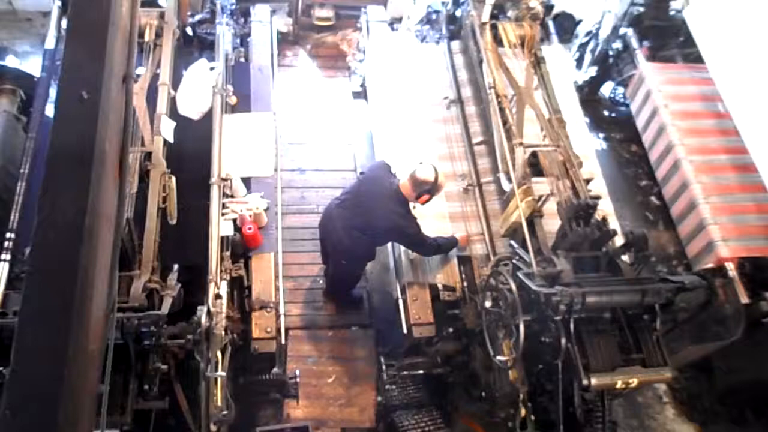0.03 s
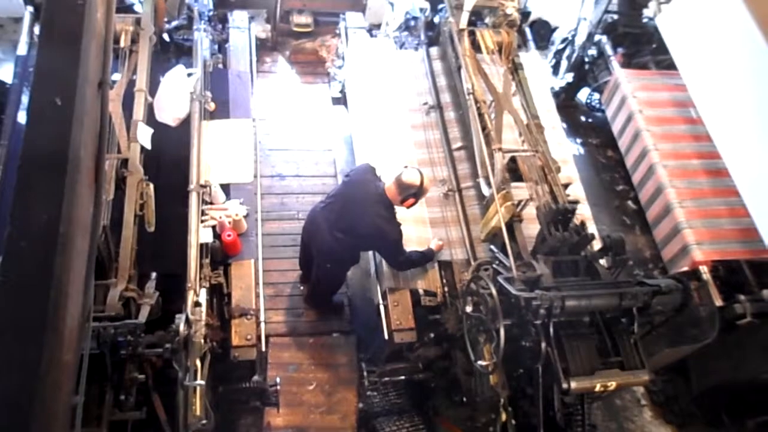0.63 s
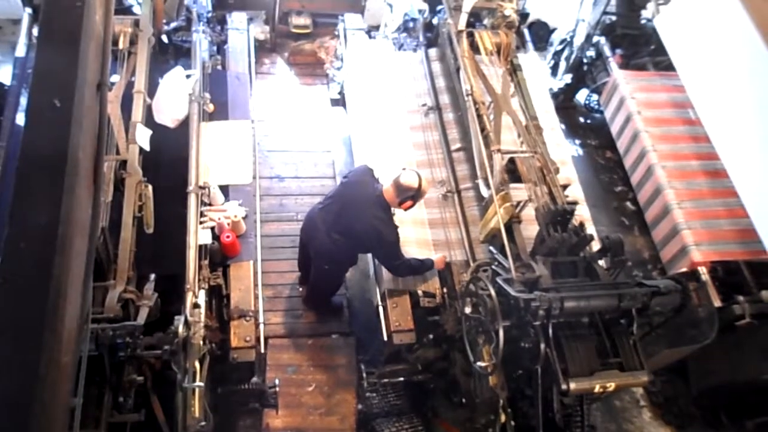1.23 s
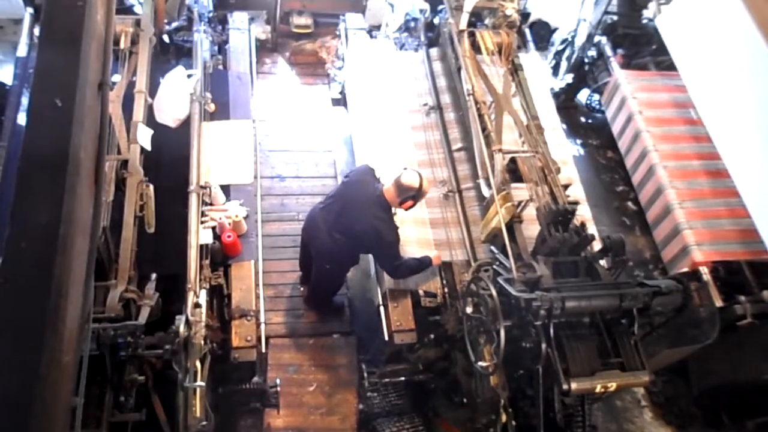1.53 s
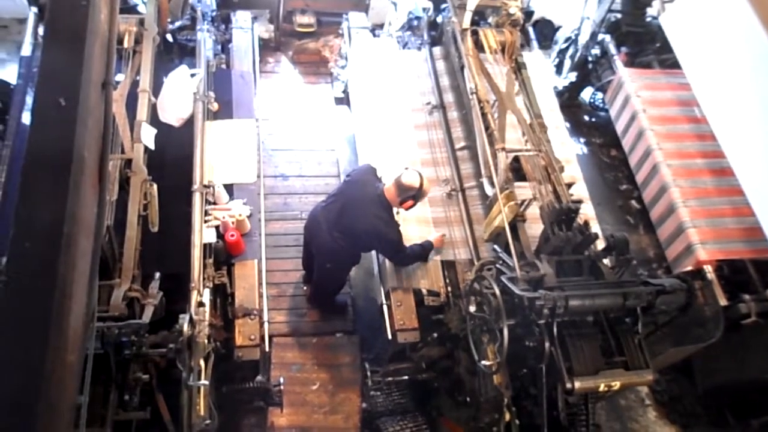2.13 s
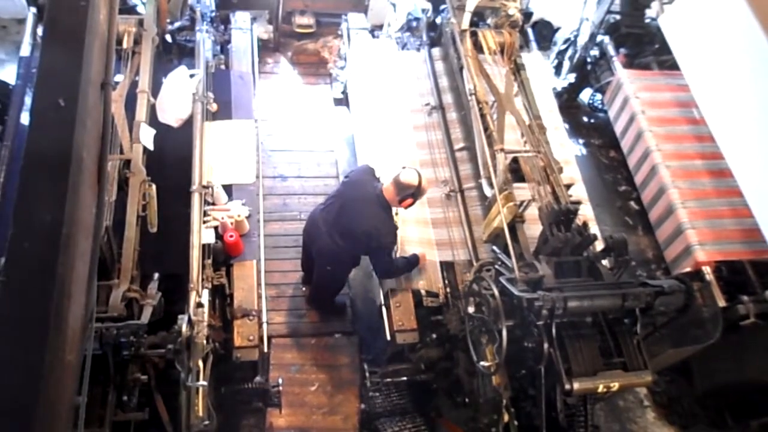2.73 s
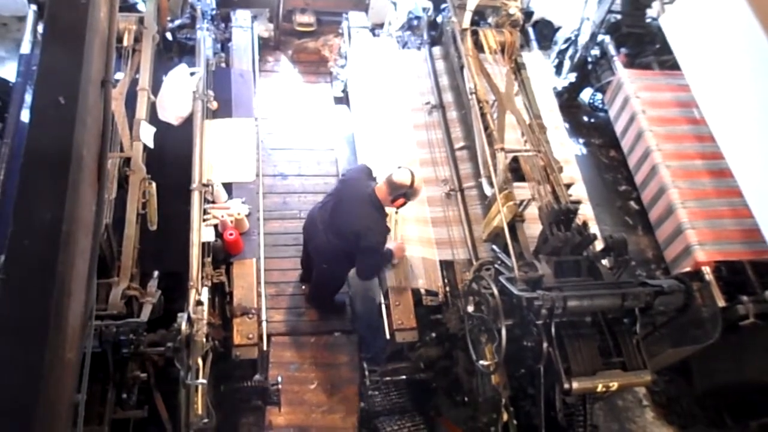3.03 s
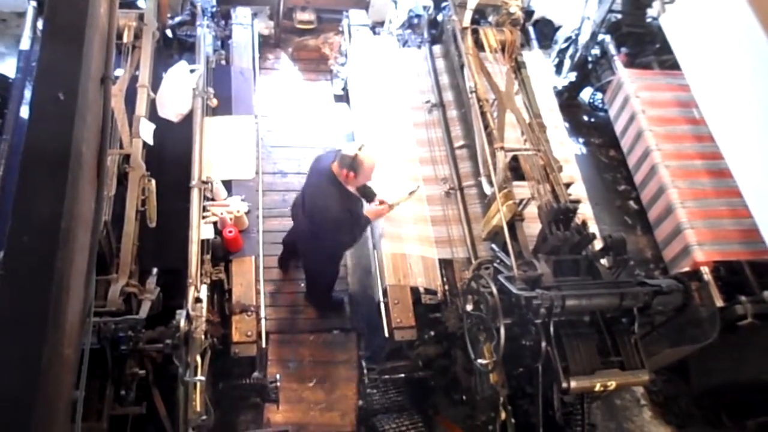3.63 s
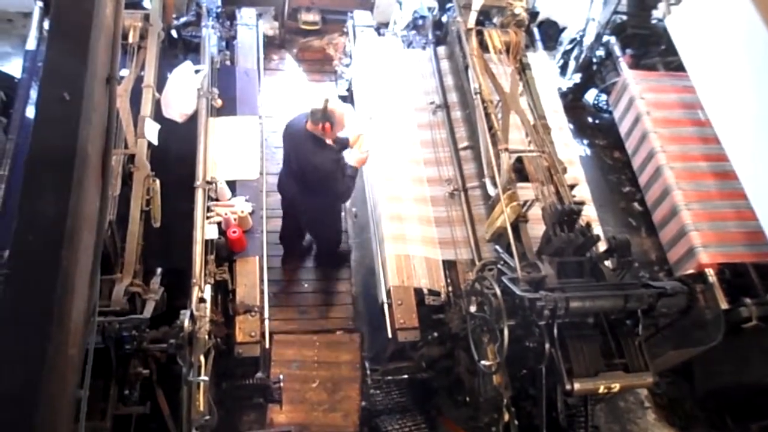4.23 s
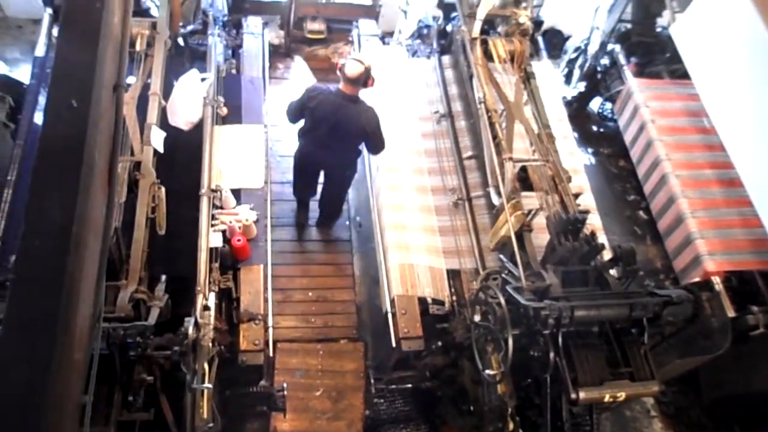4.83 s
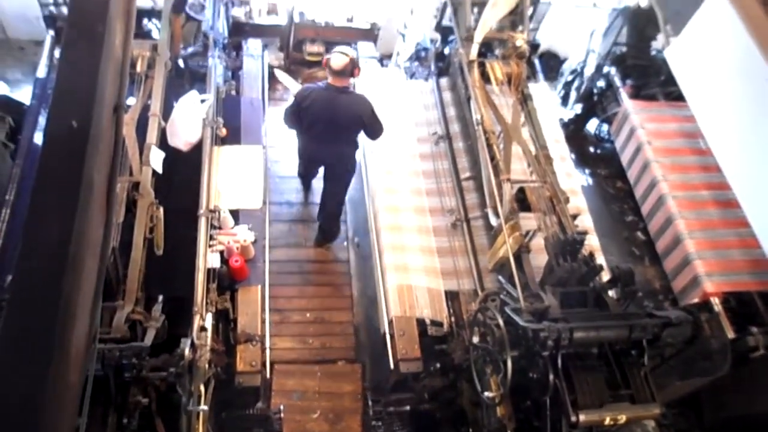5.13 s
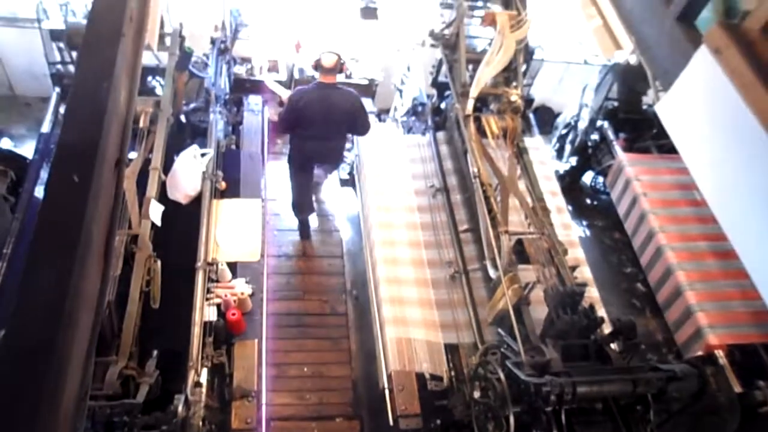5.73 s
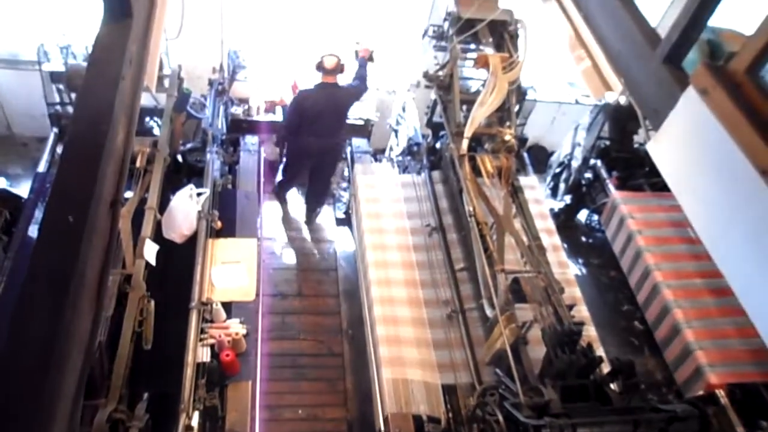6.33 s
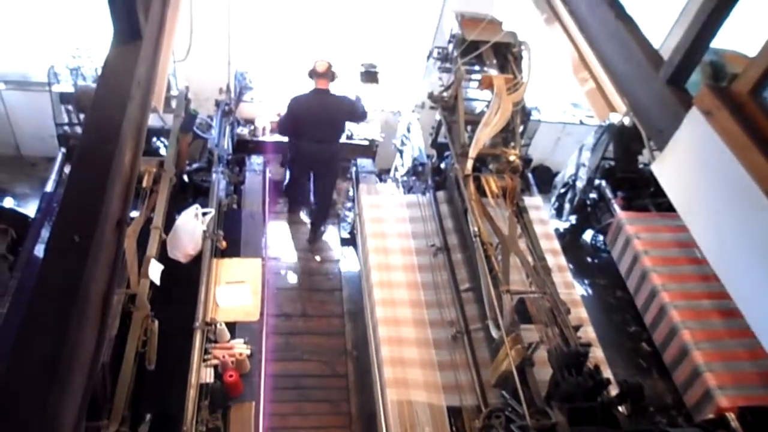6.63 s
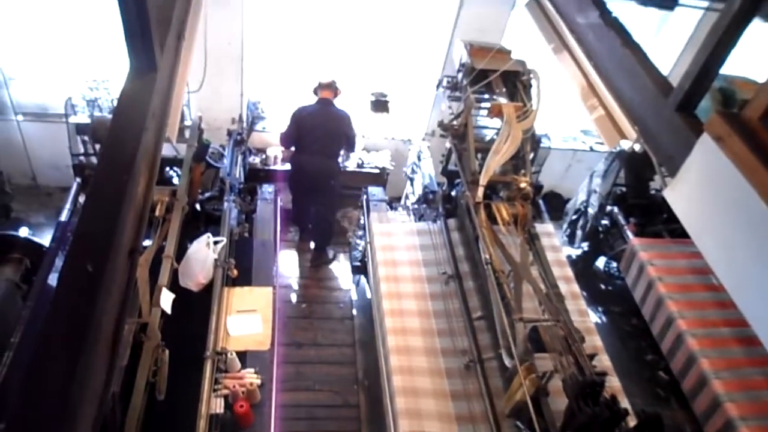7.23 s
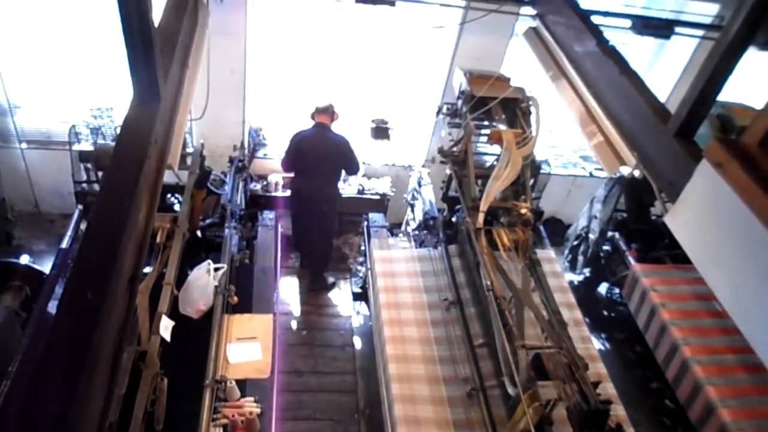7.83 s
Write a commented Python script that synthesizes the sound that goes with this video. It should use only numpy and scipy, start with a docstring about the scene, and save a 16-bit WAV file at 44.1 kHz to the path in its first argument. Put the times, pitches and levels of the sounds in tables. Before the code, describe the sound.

Loud, rhythmic clatter from a weaving loom starts suddenly and carries on without a break, heard in mono in an echoing hall. Each cycle brings a rattle of the harness and levers, a sharp wooden crack with a low thud, then the hard knock of the shuttle landing. The strokes vary slightly in force. Underneath, gears grind, small metal parts jingle, a loose wheel rings faintly and the drive gives a steady rushing rumble.

```python
"""A shuttle power loom weaves at about 83 picks a minute in a mill hall, in mono, cutting in abruptly.
In each crank turn the harness rattles up, levers drop, and the picking stick whips the shuttle off
with a thump through the floor. A loose wheel sings; a quarter second after the pick the shuttle slams
into the far box and meets the buffer. The weave repeats every four picks.
Throughout, gears grind, loose parts clink, dry joints squeak now and then, and the floor rumbles."""
import sys
import numpy as np
from scipy import signal
from scipy.io import wavfile
from scipy.ndimage import uniform_filter1d

SR = 44100
rng = np.random.default_rng(int(sys.argv[2]) if len(sys.argv) > 2 else 0)


def log_audio(samples):
    """Write samples as a 16-bit WAV file to the path given in sys.argv[1]."""
    # one column per channel
    frames = np.atleast_2d(samples).T
    # limit to full scale, then quantise
    limited = np.clip(frames, -1, 1)
    pcm = np.round(limited * 32767).astype(np.int16)
    wavfile.write(sys.argv[1], SR, pcm)


N = 352359
TIME = np.arange(N) / SR
START_S, CUTOFF_HZ = .538, 15800

# shuttle throws, one per crank turn: start_s, extra_db
PICKS = [(.672, -1), (1.38, -.5), (2.109, -3), (2.841, -1), (3.566, 0), (4.276, 0), (5.004, -3), (5.731, 1),
         (6.458, 0), (7.166, -0.5), (7.894, -3)]
# the four throws of the weave: wood_db, crack_db, thump_db
THROWS = [(-2, 1.5, -7), (-0.5, -1, -11), (3.5, 2, -6.5), (-5.5, 0, -12)]
# iron frame resonances: pitch_hz, width_hz, gain_db
FRAME_MODES = [(114, 6.3, -23), (158, 13, -6.5), (217, 11, -5.5), (272, 34, -3), (350, 52, -21),
               (718, 110, -9.5), (965, 36, -4.5), (1197, 45, -2.5), (1487, 110, -7.5), (2510, 350, -9),
               (6900, 530, -16), (8750, 43, -25), (10760, 550, -3), (12850, 40, -14)]
# spectrum of the jolted frame: freq_hz, density_db
JOLT_COLOUR = [(60, -19), (130, -9), (190, -10), (280, -4), (400, 0), (520, -6.5), (800, -1.5), (2000, -45),
               (15500, -60)]
# spectrum of harness and levers: freq_hz, density_db
HARNESS_COLOUR = [(60, -6), (300, -7), (800, -5.5), (1500, 0.5), (2700, -1), (4500, -3), (7000, -3.5),
                  (9000, -7.5), (11000, -12.5), (13000, -22), (15500, -19.5)]


def picking():
    """The stick cracks against the shuttle, the strap snaps taut, the recoil shakes the floor."""
    # spectra of stick and floor: freq_hz, density_db
    stick_colour = [(60, -28), (250, -12), (500, -5.5), (750, -6), (1200, 4), (2000, 0.5), (3000, -2),
                    (4500, -7.5), (7000, -2.5), (10000, -13), (12500, -15.5), (15500, -20.5)]
    floor_colour = [(30, -12), (58, -18), (85, -8), (125, 0), (200, -2.5), (280, -2.5), (450, -2.5),
                    (700, -3.5), (1500, -16), (15500, -62)]
    contact_s = .014
    start_s, extra_db = np.transpose(PICKS)
    wood_db, crack_db, thump_db = extra_db + in_rotation(THROWS, len(start_s))
    stick = responses(stick_colour, FRAME_MODES, near_t60_s=.42, hall_db=-6.5, count=4)
    crack = blows(start_s, wood_db, crack_db, contact_s, stick, split_hz=1600)
    strap = responses(stick_colour, FRAME_MODES, near_t60_s=.047, hall_db=-31, count=3)
    snap = blows(start_s + .0011, crack_db - 12, crack_db - 1.5, contact_s / 2, strap, split_hz=4100)
    floor = responses(floor_colour, FRAME_MODES, near_t60_s=.22, hall_db=-11, count=5)
    thump = blows(start_s, thump_db, thump_db - 7, contact_s, floor, split_hz=570)
    return crack + snap + thump


def shuttle_box():
    """The shuttle grazes the box, slams in, hits the buffer: steel rings, frame jolts, box knocks."""
    # box entries: start_s, buffer_db, note_after_s, note_hz, note_db
    arrivals = [(.924, -6, .012, 2060, -41), (1.628, 2, 0.04, 724, -29), (2.376, -10, .005, 1420, -45),
                (3.121, -3.5, 0.015, 2290, -36), (3.819, -3, .016, 2810, -39),
                (4.52, 2.5, 0.046, 709, -31.5), (5.239, -1, .018, 860, -30), (6.014, -8.5, .006, 1090, -40),
                (6.708, -13, .01, 1400, -42), (7.411, 2, .044, 716, -29)]
    # landings of the four throws: graze_lead_s, graze_db, wood_db, crack_db, jolt_db, contact_s
    landings = [(.012, -5.5, -1.5, 1.5, -25, .009), (0.0066, -30, -3.5, -1, -13, .004),
                (.006, -19, 1, -1.5, -8.5, .004), (.029, -8, -29, 1, -18, .013)]
    # box spectrum: freq_hz, density_db
    box_colour = [(60, -45), (150, -13.5), (270, -14), (500, -16.5), (800, 3.5), (1200, 2), (2200, -0.5),
                  (3000, 1), (4500, -6), (7200, -5), (8700, -9), (12000, -10.5), (13500, -20), (15500, -22)]
    # steel fittings: pitch_hz, width_hz, gain_db
    steel_modes = [(1357, 48, -5.5), (2006, 130, 0), (2350, 52, -11), (2740, 49, -12), (3690, 82, -1.5),
                   (5200, 29, -17), (5680, 25, -21), (6350, 33, -4), (7630, 64, 0), (10720, 76, 0),
                   (12180, 70, -21), (13570, 60, -1), (15000, 80, 1)]
    start_s, buffer_db, note_after_s, note_hz, note_db = np.transpose(arrivals)
    graze_lead_s, graze_db, wood_db, crack_db, jolt_db, contact_s = in_rotation(landings, len(start_s))
    stop_s = start_s + .04
    box = responses(box_colour, steel_modes, near_t60_s=.19, hall_db=-6.5, count=5)
    frame = responses(JOLT_COLOUR, FRAME_MODES, near_t60_s=.35, hall_db=-28, count=3)
    graze = blows(start_s - graze_lead_s, graze_db - 1, graze_db, contact_s, box, split_hz=1400)
    slam = blows(start_s, wood_db, crack_db, contact_s, box, split_hz=1400)
    buffer = blows(stop_s, buffer_db, .89 * buffer_db - 3.5, contact_s=.009, paths=box, split_hz=1600)
    jolts_s, jolts_db = np.r_[start_s, stop_s], np.r_[jolt_db, buffer_db - 16.5]
    jolts = blows(jolts_s, jolts_db, jolts_db - 21, contact_s=.00695, paths=frame, split_hz=760)
    knock = ringing(zip(start_s + note_after_s, note_hz, note_db), rise_s=.0011, t60_s=.26, wander_hz=29)
    return graze + slam + buffer + jolts + knock


def levers():
    """Light clacks: levers drop as the shed opens, boxes shift once per repeat, a chain link catches."""
    # lever drops before each pick: lead_s, wood_db, crack_db
    lever_drops = [(0.17, -18, -14.5), (.146, -16, -7), (.058, -6, -17)]
    # chain catches: start_s, wood_db, crack_db
    catches = [(2.549, -25, -10), (2.734, -1.5, -20), (2.819, 0.5, -7), (3.39, -21, -10), (3.459, -8, -19),
               (4.829, -9, -9), (5.505, -19, -11)]
    drops = [(pick_s - lead_s, wood_db, crack_db)
             for pick_s in pick_times() for lead_s, wood_db, crack_db in lever_drops]
    shifts = [(pick_s + .205, -20, -12.5) for pick_s in pick_times()[::len(THROWS)]]
    start_s, wood_db, crack_db = np.transpose(drops + shifts + catches)
    harness = responses(HARNESS_COLOUR, FRAME_MODES, near_t60_s=.084, hall_db=-3.5, count=3)
    return blows(start_s, wood_db, crack_db, contact_s=.01, paths=harness, split_hz=2900)


def running_gear():
    """Harness rattle, gear grind, frame sway and floor rumble swell and ebb with the crank angle."""
    # one crank turn, pick to pick: angle_turns, rattle_db, grind_db, sway_db
    crank_cycle = [(0, -34.5, -33, -38), (.08, -35.5, -35.5, -39.5), (.17, -53.5, -37, -53),
                   (.31, -47, -41, -52), (.37, -31.5, -39.5, -69), (.5, -46, -52.5, -52),
                   (.62, -45.5, -51.5, -52.5), (.72, -38.5, -39.5, -46), (.8, -38.5, -48.5, -48.5),
                   (.88, -32.5, -36, -46.5), (.94, -36, -31.5, -41.5), (1, -33.5, -35, -45)]
    # gear spectrum: freq_hz, density_db
    gear_colour = [(60, -30), (250, -2.5), (500, -1.5), (720, 0.5), (1200, -2), (1700, -2.5), (2500, -6.5),
                   (4000, -12), (8000, -55), (15500, -49)]
    floor_hz, floor_width_hz = 30.6, 16
    angle_turns = crank_turns() % 1
    turns, *levels_db = np.transpose(crank_cycle)
    rattle_db, grind_db, sway_db = [np.interp(angle_turns, turns, db) for db in levels_db]
    extra_rattle_db, extra_grind_db = load_db()
    harness = responses(HARNESS_COLOUR, FRAME_MODES, near_t60_s=.19, hall_db=-3.5, count=3)
    rattle = chatter(harness, rattle_db + extra_rattle_db, per_s=450, uneven_db=4)
    gears = responses(gear_colour, FRAME_MODES, near_t60_s=.1, hall_db=-6.5, count=4)
    grind = chatter(gears, grind_db + extra_grind_db, per_s=600, uneven_db=2.56)
    frame = responses(JOLT_COLOUR, FRAME_MODES, near_t60_s=.18, hall_db=-11.5, count=4)
    sway = chatter(frame, sway_db + extra_grind_db, per_s=500, uneven_db=.71)
    floor = resonance(rng.standard_normal(N), floor_hz, floor_width_hz)
    rumble = rms_one(resonance(floor, floor_hz, floor_width_hz))
    rumble_db = -57 + 4.7 * np.cos(2 * np.pi * (angle_turns - .15))   # peaks just after each pick
    return rattle + grind + sway + rumble * from_db(rumble_db)


def wheel():
    """A loose wheel sings after each pick, louder under load, and when jogged in the pauses."""
    # jogs: start_s, level_db
    jogs = [(1.88, -40), (3.29, -41.5), (4.13, -45), (4.742, -42), (5.511, -35), (6.94, -41.5)]
    pitch_hz, delay_s = 1165, .1
    _, grind_db = load_db()
    after_picks = [(s, grind_db[int(s * SR)] - 40.5) for s in pick_times() + delay_s if s < TIME[-1]]
    strikes = [(s, pitch_hz, db) for s, db in after_picks + jogs]
    return ringing(strikes, rise_s=.014, t60_s=.36, wander_hz=11)


def clinks(level_db, per_s, t60_s, count):
    """Loose rods, links and springs, touched at random, each ring at their own pitch."""
    # ring strength by pitch: pitch_hz, gain_db
    clink_gains = [(600, -3), (1200, 2), (2500, -2), (4500, -8.5), (7500, -6), (10000, -20), (14000, -26)]
    out, t = np.zeros(N + SR), TIME[:SR // 4]
    pitches_hz = np.geomspace(600, 14000, count) * from_db(rng.uniform(-.3, .3, count))
    envelope = from_db(-60 * t / t60_s) * (1 - np.exp(-t / .001))
    for when, part, softness, phase_turns in rng.random((int(per_s * N / SR), 4)):
        at, hz = int(when * N), pitches_hz[int(part * count)]
        db = level_db[at] + at_hz(clink_gains, hz) - 6 * softness
        out[at:at + len(t)] += from_db(db) * envelope * np.sin(2 * np.pi * (hz * t + phase_turns))
    return out[:N]


def squeaks():
    """Dry joints whistle by stick-slip, with a weak octave, heard mostly by way of the hall."""
    # joint slips: start_s, length_s, start_hz, end_hz, level_db, roughness_ratio
    slips = [(1.775, .035, 13100, 13000, -53, .008), (3.264, 0.031, 7460, 7270, -35.5, 0.016),
             (4.02, 0.021, 3670, 3630, -44, 0.018), (5.494, 0.031, 10600, 10430, -36, .007),
             (6.908, .03, 5640, 5600, -46.5, .03), (6.924, 0.065, 4700, 4960, -47, .025),
             (4.18, .05, 14050, 14000, -57, .006), (5.89, .04, 14000, 14000, -61, .005)]
    out = np.zeros(N)
    waver = rms_one(resonance(rng.standard_normal(N), hz=110, width_hz=220))
    for start_s, length_s, start_hz, end_hz, level_db, roughness in slips:
        along = np.clip((TIME - start_s) / length_s, 0, 1)
        on = (along > 0) & (along < 1)
        pitch_hz = (start_hz + (end_hz - start_hz) * along[on]) * (1 + roughness * waver[on])
        phase = 2 * np.pi * np.cumsum(pitch_hz) / SR
        octave = from_db(-19) * (2 * start_hz < CUTOFF_HZ) * np.sin(2 * phase)
        out[on] += from_db(level_db) * np.sin(np.pi * along[on]) * (np.sin(phase) + octave)
    tail = rms_one(rng.standard_normal(SR) * from_db(-60 * TIME[:SR] / .25)) / np.sqrt(SR)
    return out + 2 * signal.oaconvolve(out, tail)[:N]


def drive_wash():
    """Steady noise of the drive in the hall."""
    # wash spectrum: freq_hz, density_db
    wash_colour = [(20, -12), (30, 8), (42, -11), (58, -22), (120, -11.5), (280, -4.5), (500, -3.5),
                   (750, -8), (1300, -3), (2500, -6.5), (4500, -7.5), (7500, -12), (11000, -18),
                   (15500, -32)]
    return from_db(-43.5) * rms_one(sum(band for _, band in noise_bands(wash_colour, (N,))))


def pick_times():
    """Times of the throws in s."""
    return np.array(PICKS)[:, 0]


def crank_turns():
    """Crank turns since the first pick, per sample."""
    picks_s = pick_times()
    period_s = np.mean(np.diff(picks_s))
    marks_s = np.r_[picks_s[0] - period_s, picks_s, picks_s[-1] + period_s]
    return np.interp(TIME, marks_s, np.arange(len(marks_s)) - 1)


def load_db():
    """Extra rattle and grind: the drive load cycles with the weave and swells slowly."""
    # load over one repeat: angle_turns, rattle_db, grind_db
    weave_load = [(0, -3.5, -1), (.5, 0, -1.5), (.7, -5, -0.5), (1.15, 6.5, 1.5), (1.5, -5.5, 3),
                  (1.8, 0.5, 1.5), (2.15, 6, 0.5), (2.45, 1.5, 5.5), (2.8, -0.5, 2.5), (3.2, 0, -3),
                  (3.5, 2.5, -1), (3.8, -3, 0)]
    # slow swell: time_s, level_db
    swell = [(.55, 1), (1.3, -1), (1.75, -0.5), (2.2, -0.5), (3.0, -1.5), (3.3, 2), (4.3, -.5), (5.4, 1.5),
             (5.9, 2), (6.5, 1.5), (7.2, -2.5), (7.6, 4.5), (7.99, -2)]
    turns, *extras_db = np.transpose(weave_load)
    swell_db = np.interp(TIME, *np.transpose(swell))
    return [swell_db + np.interp(crank_turns(), turns, db, period=len(THROWS)) for db in extras_db]


def responses(colour, modes, near_t60_s, hall_db, count):
    """Unit-energy tap responses of `count` points on the loom: a dense short ring plus the hall tail."""
    # hall decay: freq_hz, t60_s
    hall_decay = [(60, 1.2), (300, 0.87), (1200, 0.89), (3000, 0.59), (7000, 0.51), (15000, 0.44)]
    t, out = TIME[:SR], 0
    for hz, band in noise_bands(colour, (count, SR)):
        near = from_db(-60 * t / near_t60_s)
        tail = from_db(hall_db - 60 * t / at_hz(hall_decay, hz))
        out = out + band * np.hypot(near, tail)
    out = out + sum(from_db(db) * resonance(out, hz, width_hz) for hz, width_hz, db in modes)
    return out / np.sqrt(np.sum(out ** 2, axis=1, keepdims=True))


def blows(start_s, wood_db, crack_db, contact_s, paths, split_hz):
    """Each blow is a quick run of contacts, one per path: wood below split_hz, crack above."""
    out, lowpass = np.zeros(N), signal.butter(1, split_hz, fs=SR)
    for k, path in enumerate(paths):
        jitter = rng.uniform(-.3, .3, len(start_s)) * (k > 0)
        late_s = contact_s * (k + jitter) / (len(paths) - 1)
        at = np.clip((start_s + late_s) * SR, 0, N - 1).astype(int)
        wood, crack = np.zeros((2, N))
        wood[at], crack[at] = from_db(wood_db), from_db(crack_db)
        force = crack + signal.lfilter(*lowpass, wood - crack + 1e-18)
        out += signal.oaconvolve(force, path)[:N]
    return out


def chatter(paths, level_db, per_s, uneven_db):
    """Many loose parts touch at random, with uneven force."""
    out = np.zeros(N)
    for path in paths:
        touches = (rng.random(N) < per_s / len(paths) / SR) * rng.choice([-1, 1], N)
        force = rms_one(touches * from_db(uneven_db * np.clip(rng.standard_normal(N), -2, 2)))
        out += signal.oaconvolve(force * from_db(level_db), path)[:N]
    return out / np.sqrt(len(paths))


def ringing(strikes, rise_s, t60_s, wander_hz):
    """A resonance swells and dies after each strike, its pitch wandering."""
    out, t = np.zeros(N + SR), TIME[:SR]
    envelope = (1 - np.exp(-(t / rise_s) ** 2)) * from_db(-60 * t / t60_s)
    for start_s, pitch_hz, level_db in strikes:
        wander = rms_one(uniform_filter1d(rng.standard_normal(SR), size=180))
        phase = 2 * np.pi * np.cumsum(pitch_hz + wander_hz * wander) / SR
        at = int(start_s * SR)
        out[at:at + SR] += from_db(level_db) * envelope / envelope.max() * np.sin(phase)
    return np.sqrt(2) * out[:N]


def noise_bands(colour, shape):
    """Yield (centre_hz, noise band); neighbours are uncorrelated."""
    edges_hz = np.geomspace(20, 17000, 25)
    white = rng.standard_normal((2, *shape))
    for k, (low_hz, high_hz) in enumerate(zip(edges_hz, edges_hz[1:])):
        centre_hz = np.sqrt(low_hz * high_hz)
        bandpass = signal.butter(2, [low_hz, high_hz], "band", fs=SR, output="sos")
        yield centre_hz, from_db(at_hz(colour, centre_hz)) * signal.sosfilt(bandpass, white[k % 2])


def resonance(x, hz, width_hz):
    """Two-pole band-pass, peak gain 1."""
    r = np.exp(-np.pi * width_hz / SR)
    feedback = [1, -2 * r * np.cos(2 * np.pi * hz / SR), r * r]
    return signal.lfilter(np.array([1, 0, -1]) * (1 - r * r) / 2, feedback, x)


def in_rotation(rows, count):
    """Columns of a table whose rows cycle over `count` events."""
    return np.array(rows)[np.arange(count) % len(rows)].T


def at_hz(points, hz):
    """Read a table on a log-frequency axis."""
    freq_hz, values = np.transpose(points)
    return np.interp(np.log(hz), np.log(freq_hz), values)


def from_db(db):
    """Decibels to gain."""
    return 10 ** (np.asarray(db) / 20)


def rms_one(x):
    """Scale to rms 1."""
    return x / np.sqrt(np.mean(x ** 2) + 1e-20)


def scene():
    """The loom, alike in both channels; the harder it shakes, the louder its loose parts clink."""
    loom = picking() + shuttle_box() + levers() + wheel() + running_gear()
    power = signal.lfilter([1 / 600], [1, 1 / 600 - 1], loom ** 2)   # 14 ms smoothing
    shake_db = 10 * np.log10(power + 1e-12)
    loose = clinks(shake_db - 5.5, per_s=220, t60_s=.13, count=150)
    return np.tile(loom + loose + squeaks() + drive_wash(), (2, 1))


def record(dry):
    """Abrupt start, steep low-pass."""
    lowpass = signal.ellip(12, .1, 80, CUTOFF_HZ, fs=SR, output="sos")
    return signal.sosfilt(lowpass, dry * (TIME >= START_S))


dry = scene()
out = record(dry)
log_audio(out)
```